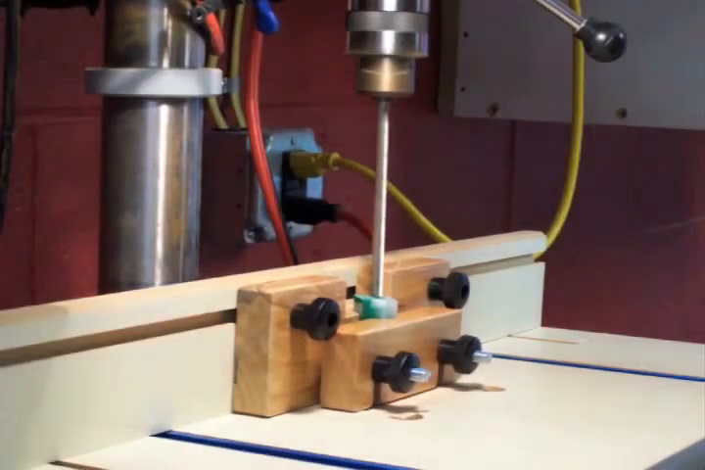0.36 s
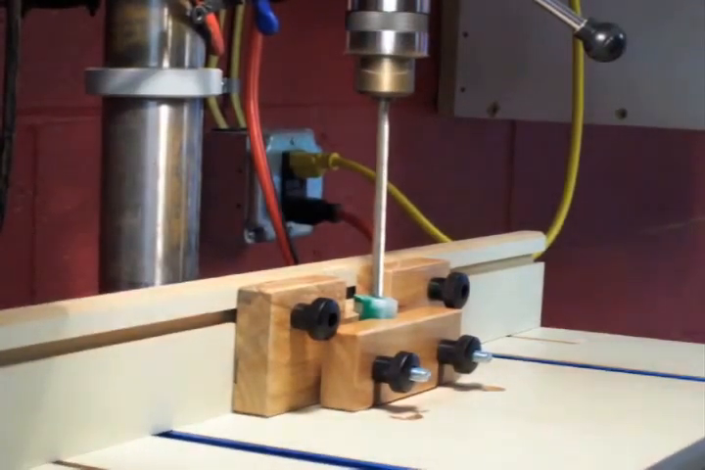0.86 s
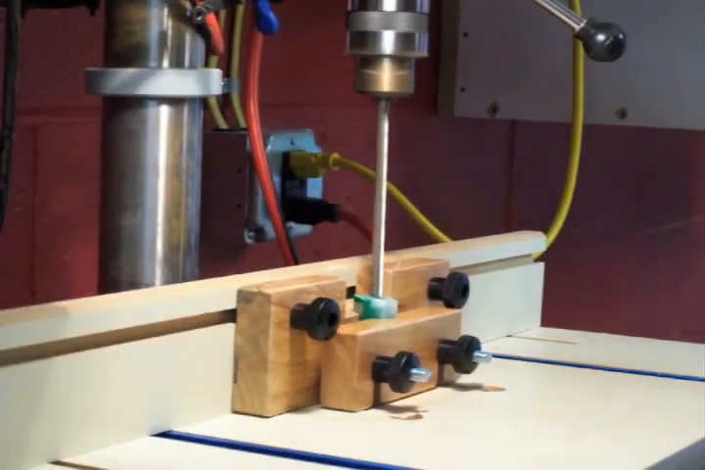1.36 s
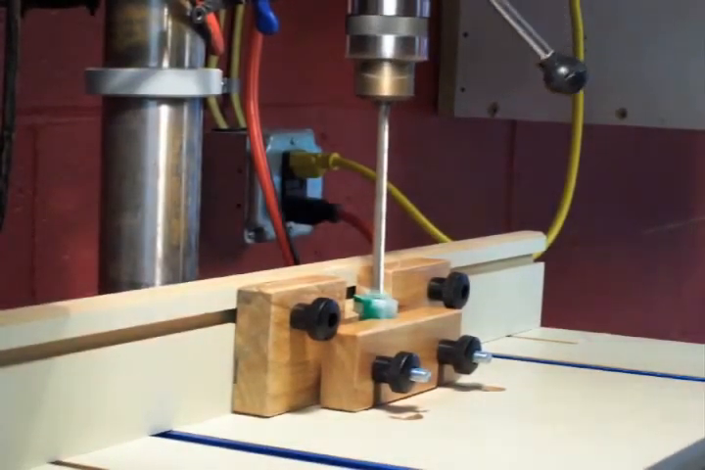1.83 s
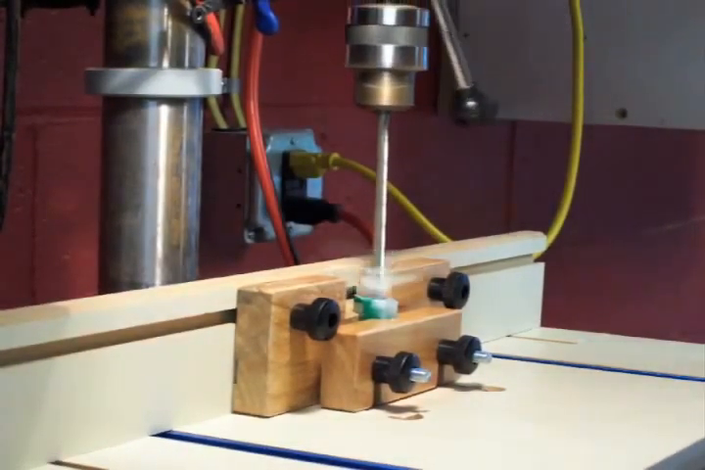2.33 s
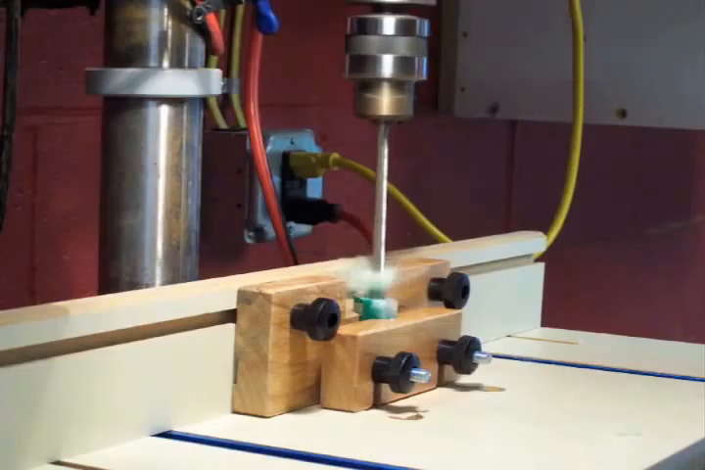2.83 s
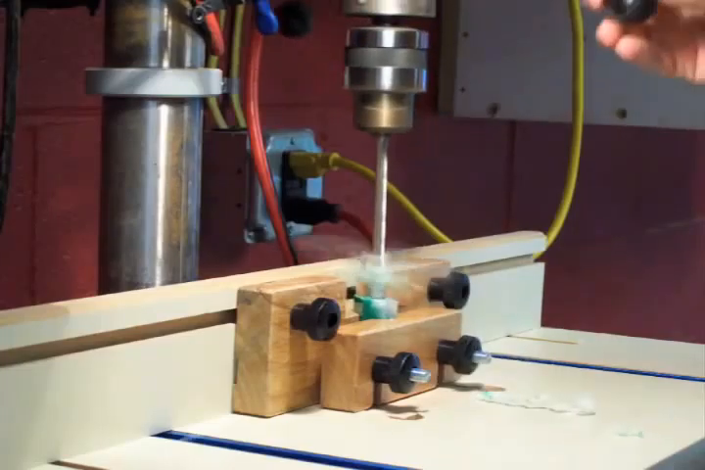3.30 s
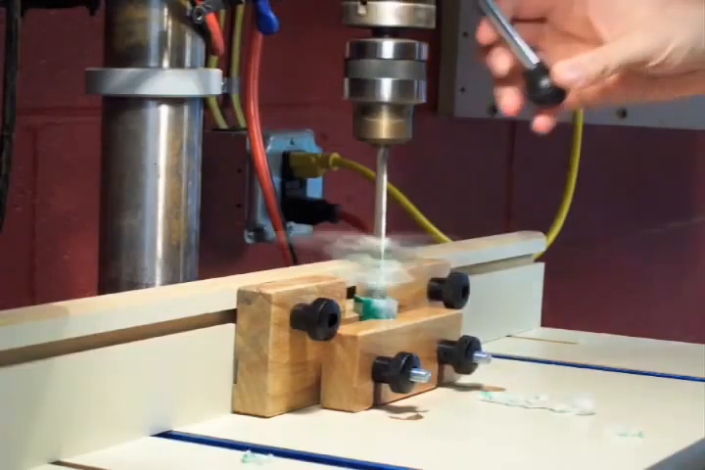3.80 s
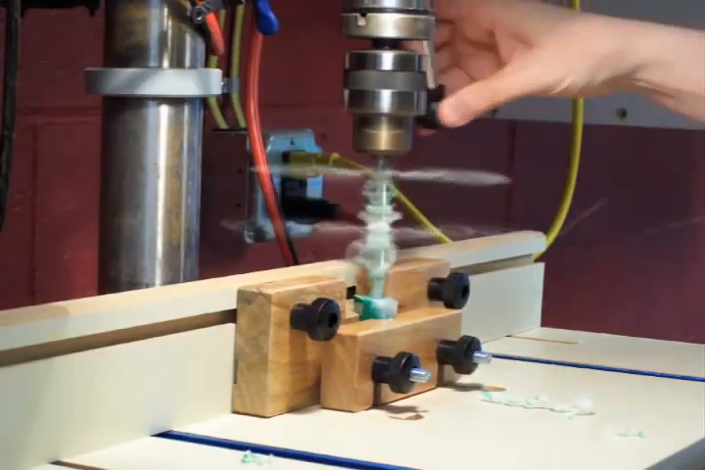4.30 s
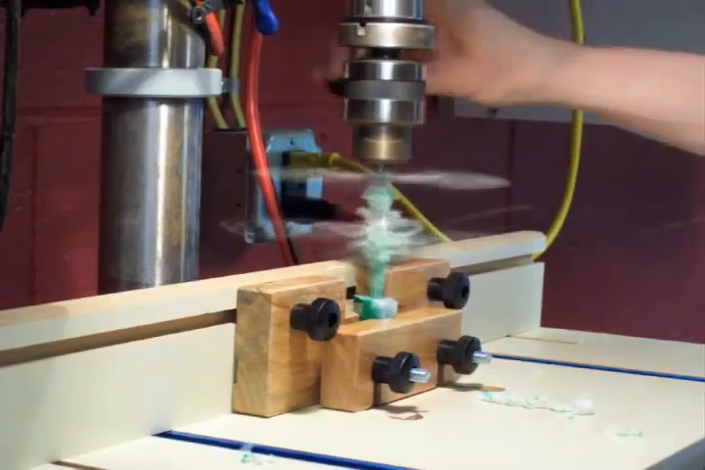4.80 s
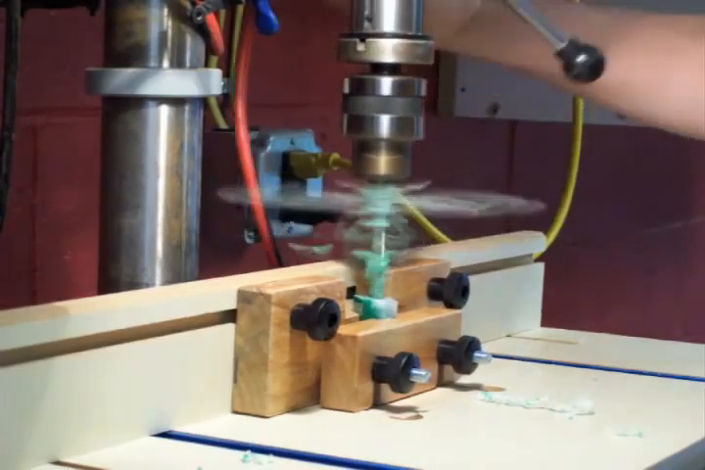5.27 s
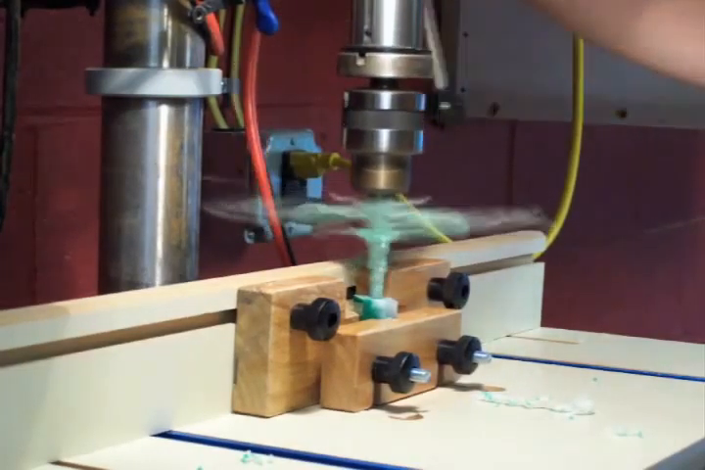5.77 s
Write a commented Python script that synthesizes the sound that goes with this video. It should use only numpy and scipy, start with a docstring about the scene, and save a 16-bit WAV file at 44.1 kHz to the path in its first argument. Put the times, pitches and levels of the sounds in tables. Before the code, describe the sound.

Low motor hum and fast spindle rattle give way to loud hissing plastic drilling, stuttering high squeaks, a rough squeal, then renewed cutting.

```python
"""A drill press idles with a low motor rumble, its spindle ticking once a turn; then a long bit bores into plastic.
Motor and cut are shaped noise, ringing in the castings, the bit and the wooden jig. The tip whistles at first:
a gliding band of noise. The flutes squeak in short tones as they rub the wall of the deepening hole,
then break into a squeal of four partials before the bit backs off and bites again."""
import sys
import numpy as np
from scipy import signal
from scipy.fft import rfft, irfft
from scipy.io import wavfile

SR = 44100
rng = np.random.default_rng(int(sys.argv[2]) if len(sys.argv) > 2 else 0)


def how_loud(loudness_db):
    """Turn decibels into a plain amplitude multiplier (0 dB gives 1, 20 dB gives 10)."""
    steps = np.asarray(loudness_db, float) / 20
    return 10 ** steps


def bounce(signal):
    """Save signal as a 16-bit WAV file at the path given by the first command-line argument."""
    frames = np.transpose(np.atleast_2d(signal))
    limited = np.clip(frames, -1, 1)
    pcm = np.round(limited * 32767).astype(np.int16)
    wavfile.write(sys.argv[1], SR, pcm)


N = 270774

IDLE_HZ, SPINDLE_HZ = 29.53, 28.6   # turns a second, free and under load
IDLE_END_S = 1.426   # the free-running rumble starts to sink away
SHALLOW_ENDS_S = (2.7, 3.5)   # the hole starts to damp the bit: begins, full


def rms_one(x):
    """Scales to unit power."""
    return x / np.sqrt(np.mean(np.abs(x) ** 2) + 1e-20)


def in_time(rows):
    """Draws each column of a curve at every sample."""
    s, *columns = np.transpose(rows)
    return [np.interp(np.arange(N) / SR, s, c) for c in columns]


def while_on(rows, fade):
    """Gives 1 within the span of a curve, fading to 0 outside."""
    first, last = rows[0][0], rows[-1][0]
    return np.interp(np.arange(N) / SR, [first - fade, first, last, last + fade], [0, 1, 1, 0])


def ramp(start_s, end_s):
    """Rises from 0 to 1 between two moments."""
    return np.interp(np.arange(N) / SR, [start_s, end_s], [0, 1])


def held_then_fading(db, until_s, db_per_s):
    """A level in dB that holds, then falls at a steady rate."""
    return db - db_per_s * np.maximum(np.arange(N) / SR - until_s, 0)


def drift(rate):
    """Slow chance of spread 1: noise smoothed by two poles at the rate in Hz."""
    r = np.exp(-2 * np.pi * rate / SR)
    noise = rng.standard_normal(N + SR)
    return rms_one(signal.lfilter([1], [1, -2 * r, r * r], noise)[SR:])


def grit(spread_db):
    """Noise of uneven grains; rms 1."""
    return rms_one(rng.standard_normal(N) * how_loud(spread_db * drift(350)))


def coloured(x, spectrum):
    """Shapes a signal by a spectrum; rms 1."""
    hz, db = np.transpose(spectrum)
    bins = np.fft.rfftfreq(N, 1 / SR) + 1
    gain = how_loud(np.interp(np.log(bins), np.log(hz), db))
    return rms_one(irfft(rfft(x) * gain, N))


def resonate(x, modes, steep):
    """Parallel resonances; steep ones are passed twice, which darkens the valleys."""
    out = 0
    for k, (hz, width, db) in enumerate(modes):
        r = np.exp(-np.pi * width / SR)
        b = [(1 - r * r) / 2, 0, (r * r - 1) / 2]
        a = [1, -2 * r * np.cos(2 * np.pi * hz / SR), r * r]
        y = signal.lfilter(b, a, x)
        if steep:
            y = signal.lfilter(b, a, y)
        out = out + (-1) ** k * how_loud(db) * y
    return out


def moving_ring(hz, width):
    """A narrow band of noise that glides; rms about 1."""
    wander = drift(width / 2) + 1j * drift(width / 2)
    return np.real(wander * np.exp(2j * np.pi * np.cumsum(hz) / SR))


def steady_tone(hz, waver_db):
    """A sine that wavers a little in level and pitch; rms about 1."""
    phase = 2 * np.pi * np.cumsum(hz + 1.2 * drift(4)) / SR
    return np.sqrt(2) * how_loud(waver_db * drift(4.8)) * np.sin(phase)


def burst(length, rise, fall):
    """Seconds and a flat-topped envelope."""
    s = np.arange(round(length * SR)) / SR
    return s, np.clip(np.minimum(s / rise, (s[-1] - s) / fall), 0, 1)


def once_a_turn(hz, peak_s, depth_db):
    """Gain that swings with the runout of the spindle."""
    return how_loud(depth_db * np.cos(2 * np.pi * hz * (np.arange(N) / SR - peak_s)))


def binding():
    """How hard packed chips hold the flutes, 0-1."""
    return ramp(4.28, 4.85) - ramp(5.27, 5.34)


# level of the cut and loaded motor as heard: (t/s, level/dB)
BED = [(1.3, -59), (1.48, -37.5), (1.63, -39.5), (2.5, -35), (2.96, -34.5), (3.02, -43), (3.42, -46.5),
       (3.52, -42), (3.61, -43.5), (3.8, -35), (3.88, -39), (4.0, -40.5), (4.07, -34.5), (4.19, -40.5),
       (4.33, -41.5), (4.37, -47.5), (4.55, -46), (5.32, -45.5), (5.5, -35), (5.88, -33), (5.93, -40),
       (6.0, -42.5), (6.08, -37.5)]


def bed_db():
    """The level in dB on which the cut, the loaded motor and the shank rings swell and dip together."""
    return in_time(BED)[0]


# what is left of the motor under the cut: (t/s, level/dB re the bed)
LOADED_MOTOR = [(1.65, -26), (2.2, -18), (5.3, -20.5), (5.5, -14.5), (5.9, -16.5), (6.05, -9)]
# rumble of the drive: (f/Hz, level/dB per Hz)
RUMBLE_SPECTRUM = [(20, -24.5), (40, -14.5), (75, -15.5), (266, -0.5), (430, -2.5), (600, 0.5), (700, -9.5),
                   (1010, -5.5), (1520, -10), (2080, -10.5), (2830, -11.5), (5030, -14.5), (6540, -14),
                   (7500, -32.5)]
# steady tones of rotor, mains and bearings: (f/Hz, level/dB re one another)
MOTOR_HUMS = [(68, -11.5), (90, -15.5), (120, -16.5), (150, -19), (209, -19), (269, -14.5), (415, -11.5),
              (598, -13), (1011, -10.5)]
# resonances of castings and spindle: (f/Hz, width/Hz of one pass, level/dB)
CASTING_MODES = [(270.5, 33, 0.5), (418, 100, -2.5), (1011, 30, -17), (2034, 90, -11.5), (2354, 72, -11),
                 (4240, 160, -17), (4520, 200, -14), (5030, 520, -11), (5880, 300, -21.5),
                 (6370, 120, -9.5)]


def motor():
    """Rumble, casting resonances and slightly unsteady tones; the small high modes rattle once a turn."""
    loaded_db = in_time(LOADED_MOTOR)[0] + bed_db()
    idle = how_loud(held_then_fading(-35, IDLE_END_S, 111))
    level = idle + ramp(IDLE_END_S, LOADED_MOTOR[0][0]) * how_loud(loaded_db)
    level = level * how_loud(.9 * drift(13))
    rumble = coloured(grit(spread_db=1.3), RUMBLE_SPECTRUM)
    shake = grit(spread_db=-1.2)
    rattle = once_a_turn(IDLE_HZ, .34, depth_db=5) * how_loud(2.5 * drift(40))
    low_modes = resonate(shake, CASTING_MODES[:3], steep=True)
    high_modes = resonate(shake * rattle, CASTING_MODES[3:], steep=True)
    castings = rms_one(low_modes + high_modes)
    tones = sum(how_loud(db) * steady_tone(hz, waver_db=1.8) for hz, db in MOTOR_HUMS)
    return level * (1.737 * rumble + 1.15 * castings + 1.38 * tones)


# extra knocks, loud and faint, on top of the regular ones: (t/s, level/dB)
EXTRA_KNOCKS = [(.3361, -34), (0.37, -35), (0.4698, -41), (.5008, -39), (.6065, -32), (.7791, -30.5),
                (0.9104, -31.5), (1.1483, -43), (1.3186, -57)]


def ticks():
    """Play in the spindle spline knocks once a turn: a dying rattle in the castings, new strengths per mode."""
    first_s, jitter_s = .0316, .0013
    usual_db, spread_db = -41, -0.5
    out, s = np.zeros(N), np.arange(1500) / SR
    bright = [mode for mode in CASTING_MODES if mode[0] > 1500]
    every_turn = [(first_s + k / IDLE_HZ + jitter_s * late, usual_db + spread_db * hard)
                  for k, (late, hard) in enumerate(rng.standard_normal((42, 2)))]
    for at, db in [*every_turn, *EXTRA_KNOCKS]:
        rattle = rng.standard_normal(len(s)) * np.exp(-s / .008) * np.minimum(s / .001, 1)
        # widened modes die faster; higher ones are stronger
        modes = [(hz, 3 * width, 3 * np.log(hz / 4000) + rng.normal(0, 2)) for hz, width, _ in bright]
        i = round(at * SR)
        out[i:i + len(s)] += how_loud(db) * rms_one(resonate(rattle, modes, steep=False))
    return out


# one row each for jig rumble, low bit ring, high bit ring and chip hiss: (level/dB re the bed,
# then level/dB added at first touch, while shallow, while binding, once eased)
CUT_STAGES = [(-9.5, -3.5, 0.5, -3.5, -2), (.7, 5, -0.1, -7.5, -3), (-12, 13, 9, 21, 5),
              (4, 1.5, -1, 4, 2.5)]
# resonances of the wooden jig: (f/Hz, width/Hz, level/dB)
JIG_MODES = [(429, 40, -6), (557, 35, -3.5), (662, 37, 1.5), (856, 53, 3)]
# resonances of the bit: (f/Hz, width/Hz of one pass, level/dB)
BIT_MODES = [(2149, 203, -8), (2585, 380, -7.5), (3243, 160, -16), (4153, 190, 4), (4616, 240, 4),
             (4950, 650, -3), (6350, 110, -13.5)]
# hiss of the chips: (f/Hz, level/dB per Hz)
HISS_SPECTRUM = [(500, -35), (1000, -17), (1900, -6), (2600, -16.5), (3320, -4), (4550, 2), (5800, -1),
                 (6820, -4.5), (7500, -14)]


def cut(grip):
    """Chips breaking shake jig and bit and hiss; all flutter with the turn, the treble chatters at each grip."""
    first_touch = 1 - ramp(1.45, 2.1)   # until the tip cuts at full width
    shallow = 1 - ramp(*SHALLOW_ENDS_S)
    eased = ramp(5.89, 5.94)   # the edge lifts off the bottom of the hole
    stages = np.array([np.ones(N), first_touch, shallow, binding(), eased])
    jig_db, low_db, high_db, hiss_db = np.array(CUT_STAGES) @ stages
    jig = how_loud(jig_db) * rms_one(resonate(grit(spread_db=2.5), JIG_MODES, steep=False))
    low = how_loud(low_db) * rms_one(resonate(grit(spread_db=2.5), BIT_MODES[:3], steep=True))
    high = how_loud(high_db) * rms_one(resonate(grit(spread_db=-1.0), BIT_MODES[3:], steep=True))
    hiss = how_loud(hiss_db) * coloured(grit(spread_db=1.0), HISS_SPECTRUM)
    flutter = how_loud(1.1 * drift(37)) * once_a_turn(SPINDLE_HZ, 4.131, depth_db=0.27)
    chatter = how_loud(4.5 * grip + 1.3 * drift(60))
    level = ramp(1.21, 1.54) * how_loud(bed_db()) * flutter
    return level * (jig + low + chatter * (high + hiss))


# moments when the edge snags: (t/s, level/dB, f/Hz, width/Hz of one pass, length/s)
SNAGS = [(1.319, -27, 5000, 2400, 0.0081), (1.571, -35, 6800, 900, 0.0092),
         (1.591, -23.5, 4530, 1480, 0.017), (4.584, -34, 3920, 390, 0.013),
         (4.762, -32.5, 3850, 675, 0.048), (5.867, -27.5, 4890, 1450, 0.05)]


def rasps():
    """Short harsh scrapes where the edge snags: noise bursts in one resonance."""
    out = np.zeros(N)
    for at, db, hz, width, length in SNAGS:
        s, shape = burst(length, .3 * length, .5 * length)
        noise = rng.standard_normal(len(s)) * shape
        i = round(at * SR)
        out[i:i + len(s)] += how_loud(db) * rms_one(resonate(noise, [(hz, width, 0)], steep=True))
    return out


# one row for each of two partials: (level/dB, held until t/s, then fade/dB per s, width/Hz)
WHISTLE_PARTIALS = [(-35.5, 2.1, 72, 210), (-31.5, 2.23, 16, 183)]


def whistle():
    """The tip whistles as it enters: two noisy partials whose pitch climbs and settles."""
    start_s, attack_s = 1.41, 0.056
    entry_hz, rise_hz, rise_s = 2502, 120.4, 0.8   # total rise and its time constant
    since = np.maximum(np.arange(N) / SR - start_s, 0)
    hz = entry_hz + rise_hz * (1 - np.exp(-since / rise_s))
    hz = hz * (1 + .008 * drift(120))
    partials = sum(how_loud(held_then_fading(db, until, fade)) * moving_ring((k + 1) * hz, width)
                   for k, (db, until, fade, width) in enumerate(WHISTLE_PARTIALS))
    swell = ramp(start_s, start_s + attack_s) ** 2 - ramp(*SHALLOW_ENDS_S)
    return swell * how_loud(0.6 * drift(40)) * partials


# the two bending rings of the shank: (t/s, low f/Hz, high f/Hz, level/dB re the bed)
SHANK_RINGS = [(1.7, 1079, 3120, -11), (2.3, 1076, 3132, -5.5), (2.8, 1153, 3100, -1.5),
               (3.03, 1169, 3116, -0.5), (3.2, 1250, 3405, -1.5), (3.7, 1321, 3460, -2.5),
               (4.3, 1302, 3600, -4.5), (4.78, 1326, 3686, -3)]


def shank():
    """The free length of the bit shortens, so its two bending rings rise; binding damps the low one."""
    low_hz, high_hz, level_db = in_time(SHANK_RINGS)
    low = how_loud(-6 - 26 * binding()) * moving_ring(low_hz, 280.0)
    high = moving_ring(high_hz, 370.0)
    level = how_loud(bed_db() + level_db + 2.3 * drift(49))
    return while_on(SHANK_RINGS, .03) * level * (low + high)


def wall_rub():
    """Breathy ring of the flutes on the wall: it grows steadily, throbs once a turn and is soon let go."""
    peak_s, growth_db_per_s, release_db_per_s = 4.74, 12, 100
    until_peak = np.maximum(peak_s - np.arange(N) / SR, 0)
    level_db = held_then_fading(-29, peak_s, release_db_per_s) - growth_db_per_s * until_peak
    throb = once_a_turn(SPINDLE_HZ, 3.737, depth_db=4)
    return how_loud(level_db) * throb * moving_ring(np.full(N, 6300.), 390.0)


# runs of grips on the wall: (first t/s, last t/s, then level/dB of the shank, web and flute tones)
GRIP_RUNS = [(2.985, 3.09, -38, -60, -60), (3.129, 3.442, -32.5, -74, -60),
             (3.514, 3.512, -34.5, -53.5, -40), (3.564, 3.564, -50, -60, -25.5),
             (3.58, 3.58, -30.5, -60, -28), (3.67, 3.67, -45, -60, -30), (3.737, 3.737, -26.5, -58, -27),
             (3.807, 3.807, -38, -57, -26), (3.842, 3.88, -26.5, -58, -28), (3.948, 3.948, -29, -57, -27),
             (4.027, 4.027, -55, -56, -35), (4.127, 4.164, -33, -48, -21),
             (4.198, 4.308, -29.5, -35.5, -25), (4.341, 4.448, -39, -35.5, -20.5),
             (4.485, 4.483, -41, -40, -14), (4.52, 4.57, -52, -39, -13), (4.588, 4.614, -26, -61, -32),
             (4.623, 4.708, -53, -30, -13.5), (4.764, 4.764, -42.5, -45, -14),
             (5.07, 5.24, -58, -31.5, -60)]
# pitch of the flute tone: (t/s, f/Hz)
FLUTE_PITCH = [(4.17, 6350), (4.3, 6200), (4.35, 6170), (4.45, 6150), (4.485, 6375), (4.7, 6517),
               (4.76, 6380)]


def squeaks():
    """Three tones swell fast, hold, rise a little and let go; a weak echo follows. Also gives the grip, 0-1."""
    both_flutes_s = 4.5   # from here both flutes catch, twice a turn
    usual_s, spread_db, web_hz = 0.014, -2, 4550
    out, grip = np.zeros(N), np.zeros(N)
    waver, jitter = how_loud(1.1 * drift(150)), drift(200)
    flute_hz, = in_time(FLUTE_PITCH)
    _, shank_hz, _ = in_time(SHANK_RINGS)   # the shank tone is the high bending ring
    for first, last, *tones_db in GRIP_RUNS:
        per_turn = 2 if first > both_flutes_s else 1
        count = 1 + round((last - first) * SPINDLE_HZ * per_turn)
        for at in np.linspace(first, last, count):
            now = round(at * SR)
            tones_hz = [shank_hz[now], web_hz * rng.normal(1, .02), flute_hz[now]]
            chance = rng.standard_normal((3, 3)) / per_turn
            for hz, db, (longer, later, louder) in zip(tones_hz, tones_db, chance):
                s, shape = burst(usual_s * np.exp(.28 * longer), .004, .0025)
                i = round((at - .002 + .0015 * later) * SR)
                span = slice(i, i + len(s))
                glide = 1 + .014 * (s / s[-1] - .5) + .01 * jitter[span]
                phase = 2 * np.pi * np.cumsum(hz * glide) / SR
                # tones below 5 kHz scrape; those above 4 kHz among them vary more from grip to grip
                scrape = .7 * jitter[span][::-1] + (hz > 4000) * louder
                rough = how_loud(4 * (hz < 5000) * scrape)
                tone = np.sin(phase) + .16 * np.sin(2 * phase)
                out[span] += rough * shape * how_loud(db + spread_db * louder) * tone
            grip[span] = np.maximum(grip[span], shape / per_turn)   # follows the flute tone
    out *= waver
    lag = round(0.013 * SR)
    out[lag:] += how_loud(-19) * out[:-lag]
    return out, grip


# course of the stick-slip squeal, before it throbs and sags: (t/s, f/Hz, level/dB)
SQUEAL_COURSE = [(4.79, 1680, -51), (4.81, 1713, -36.5), (4.9, 1885, -38), (5.05, 1904, -35.5),
                 (5.15, 1872, -36), (5.285, 1764, -39), (5.31, 1745, -44)]
# the grip of the squeal slackens: (t/s, looseness 0-1)
SLACKENING = [(4.8, .05), (5.06, .2), (5.16, .8), (5.3, 1)]
# partials 1 to 4: level/dB re the course
PARTIAL_LEVELS = [-0.5, 3.5, 9.5, -12]


def squeal():
    """Stick-slip on four partials, throbbing each turn; looser, both flutes beat and the pitch sags and roughens."""
    hz, level_db = in_time(SQUEAL_COURSE)
    loose, = in_time(SLACKENING)
    turn = 2 * np.pi * SPINDLE_HZ * (np.arange(N) / SR - 4.8)
    beat = np.cos(turn) + .7 * loose * np.cos(2 * turn)
    sag = .024 * loose ** 2 * (beat + .5 * drift(60))   # the pitch is lower between throbs
    roughness = (.005 + .018 * loose) * drift(250)
    phase = 2 * np.pi * np.cumsum(hz * (1 + sag + roughness)) / SR
    out, shared = 0, drift(110)
    for k, db in enumerate(PARTIAL_LEVELS):
        throb_db = (1.3 + k) * beat + (2 + loose) * (shared + drift(110))
        out = out + how_loud(level_db + db + throb_db) * np.sin((k + 1) * phase)
    return while_on(SQUEAL_COURSE, 0.012) * out


def scene():
    """All sources at one close microphone."""
    squeaking, grip = squeaks()
    drive = motor() + ticks()
    boring = cut(grip) + rasps() + whistle() + shank() + wall_rub()
    return (drive + boring + squeaking + squeal())[None]


def band_limit(x):
    """A steep low-pass at the top of the band."""
    return signal.sosfilt(signal.butter(12, 7700, fs=SR, output="sos"), x)


def record(dry):
    """A small capsule rounds loud peaks unevenly, leaving a thump under loud tones; the top is cut steeply."""
    held = 0.26 * np.tanh(dry / 0.28)
    bent = held + 7 * held ** 4   # the even power makes the rounding uneven
    no_rumble = signal.butter(1, 20, "high", fs=SR, output="sos")
    steep_top = signal.cheby2(20, 55, 7680, fs=SR, output="sos")
    finished = signal.sosfilt(steep_top, signal.sosfilt(no_rumble, bent))
    return band_limit(finished)


dry = scene()
out = record(dry)
bounce(out)
```